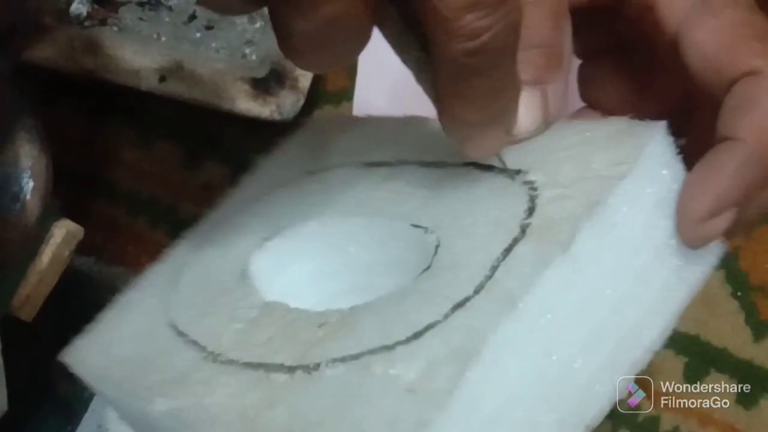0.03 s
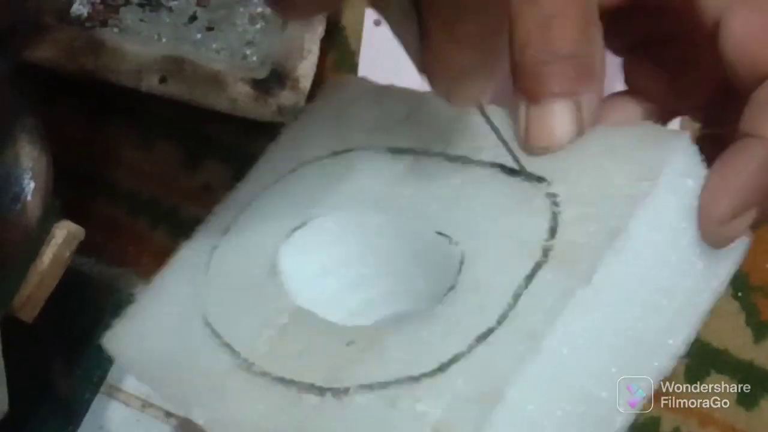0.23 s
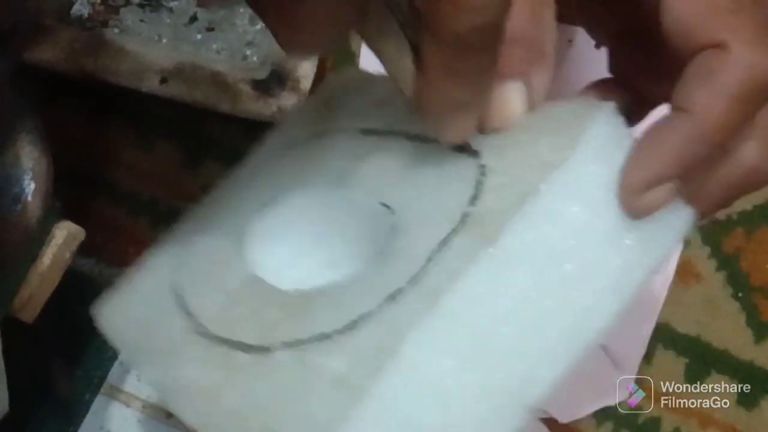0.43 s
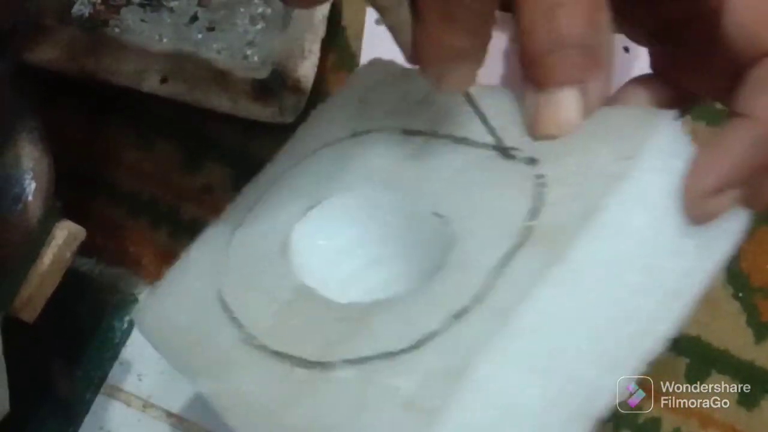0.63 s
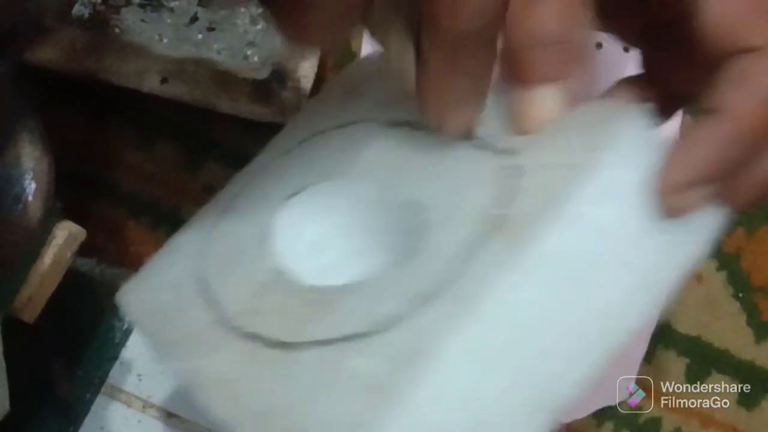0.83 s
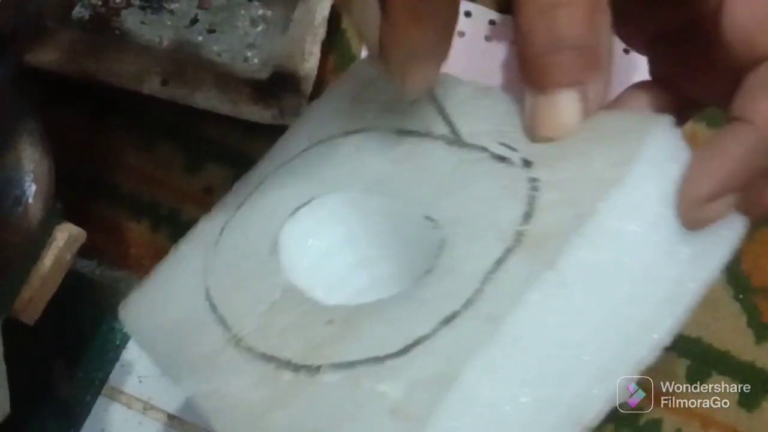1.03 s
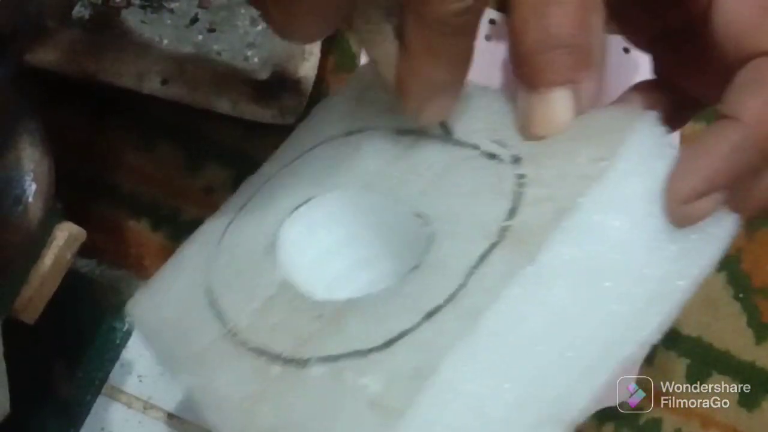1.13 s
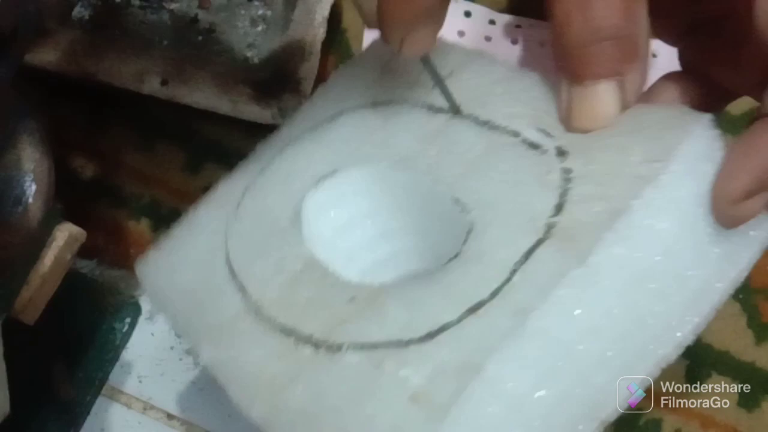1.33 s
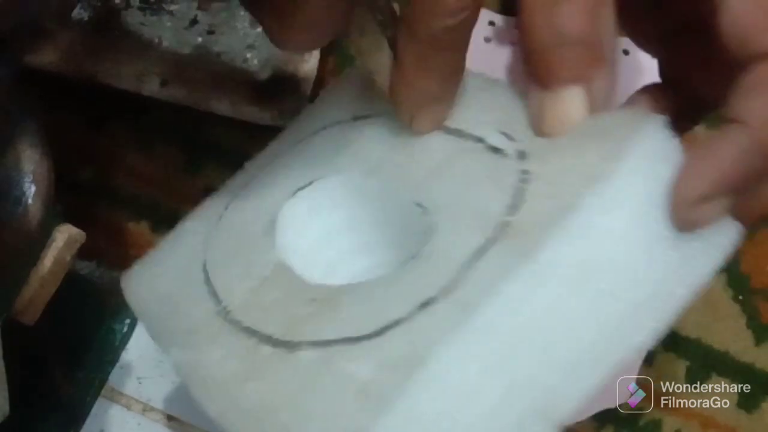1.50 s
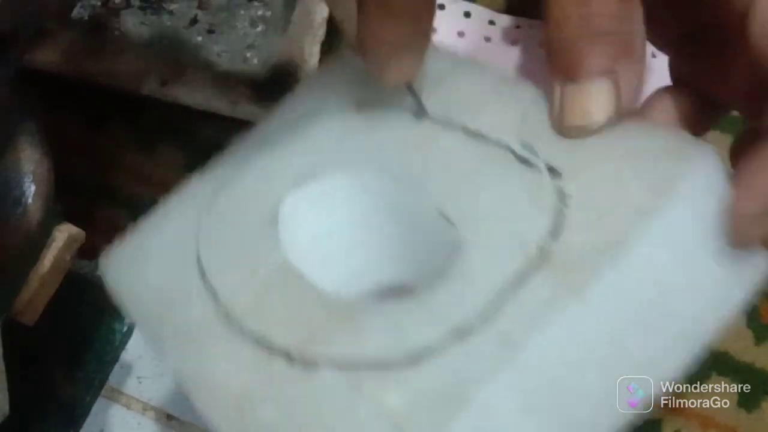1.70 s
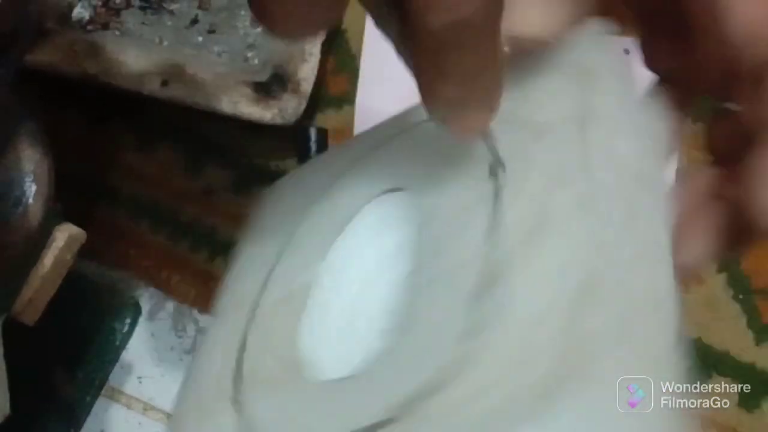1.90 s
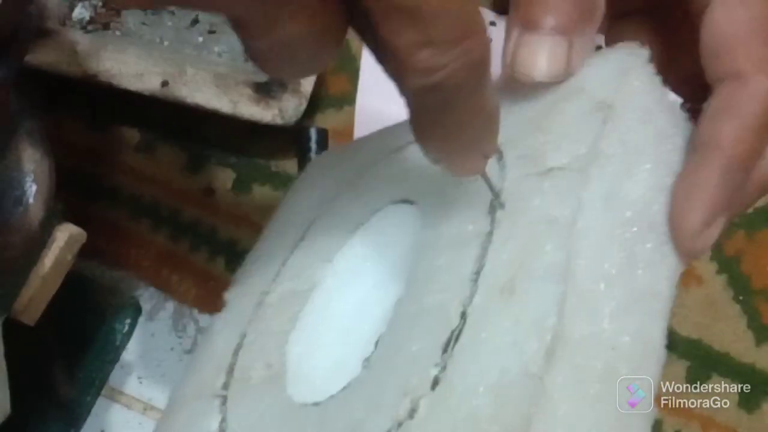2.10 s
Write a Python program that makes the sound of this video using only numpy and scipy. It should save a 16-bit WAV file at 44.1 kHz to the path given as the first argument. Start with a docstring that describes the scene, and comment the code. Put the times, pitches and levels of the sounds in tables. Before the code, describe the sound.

Close up in a small room, stiff foam rasps and crunches as a thin blade saws to and fro, sometimes snagging with a sharp click. The block bumps softly in the hands, and the last two strokes are much lighter.

```python
"""In a small room, close by, a thin blade saws to and fro through a hand-held block of stiff foam.
Each stroke tears a dense run of tiny cells that crunch and set blade and block ringing.
Now and then the blade snags and snaps free, a cell wall cracks, or the block bumps in the hands.
Nine firm strokes, then two light ones, are heard over a faint hiss and a low rumble."""
import sys
import numpy as np
from scipy import signal
from scipy.fft import rfft, irfft
from scipy.io import wavfile

SR = 44100
rng = np.random.default_rng(int(sys.argv[2]) if len(sys.argv) > 2 else 0)


def unload_audio(sound):
    """Save the sound as a 16-bit wav file, at the path given as the first command line argument."""
    columns = np.transpose(np.atleast_2d(sound))
    # keep every value between -1 and 1, then stretch to whole-number steps
    steps = np.round(np.clip(columns, -1, 1) * 32767)
    wavfile.write(sys.argv[1], SR, steps.astype(np.int16))


N = 94815
TIME = np.arange(N) / SR


def from_db(db):
    """Turn decibels into a number to multiply a sound by."""
    return 10 ** (np.asarray(db) / 20)


def unit_level(x):
    """Scale a signal so that its average power is 1."""
    return x / np.sqrt(np.mean(x ** 2) + 1e-20)


def through(x, response):
    """Filter a sound by a response (the answer to one click), scaled to an energy of 1."""
    return signal.fftconvolve(x, response / np.sqrt(np.sum(response ** 2)))[:N]


def colour(points, size=4096):
    """A response whose tone follows a curve of (Hz, dB) points."""
    hz, db = np.transpose(points)
    grid_hz = np.maximum(np.arange(size // 2 + 1) * SR / size, 1)
    gains = from_db(np.interp(np.log(grid_hz), np.log(hz), db))
    cepstrum = irfft(np.log(gains))
    cepstrum[1:size // 2] *= 2   # fold it so that nothing sounds before the click
    cepstrum[size // 2 + 1:] = 0
    return irfft(np.exp(rfft(cepstrum)))


def body(modes, band_hz, size=4096):
    """The response of a tapped object: a few fading tones, kept within a band. Wider ones die sooner."""
    t = TIME[:size]
    tones = 0
    for k, (hz, width, db) in enumerate(modes):
        fade = from_db(db) * np.sqrt(width) * np.exp(-np.pi * width * t)
        tones = tones + (-1) ** k * fade * np.sin(2 * np.pi * hz * t)
    return signal.sosfilt(signal.butter(2, band_hz, "band", fs=SR, output="sos"), tones)


def drift(rate_hz):
    """A smooth random wander, about 1 in size."""
    pole = np.exp(-2 * np.pi * rate_hz / SR)
    wander = signal.lfilter([1], [1, -2 * pole, pole * pole], rng.standard_normal(N + SR))
    return unit_level(wander[SR:])


# The tone of the hiss and of the rumble. Each row: frequency in Hz, relative level in dB.
HISS_TONE = [(200, -13.5), (330, -7), (450, -18.5), (720, -7.5), (930, -9), (1150, -2.5), (1275, 6),
             (1420, -2), (2000, -13), (2600, -14.5), (3300, -8.5), (4200, -16), (5000, -13.5), (5700, -6),
             (6200, -13), (6600, -31), (7400, -12.5), (8200, -26), (10000, -37), (13500, -40)]
RUMBLE_TONE = [(20, -10), (45, -42), (60, 1), (77, 0.5), (100, 0), (160, -11), (230, -27), (330, -9),
               (500, -33), (1500, -81)]
# How loud each is over time. Each row: time in seconds, level in dB.
HISS_LOUDNESS = [(0, -49), (.17, -52), (1.7, -51), (1.952, -53.5), (2.15, -54.5)]
RUMBLE_LOUDNESS = [(0, -60), (.45, -58), (.7, -63), (1.3, -60.5), (1.5, -57), (2.15, -54)]


def background(tone, loudness):
    """A hiss or rumble: steady noise whose level slowly rises and falls."""
    level_db = np.interp(TIME, *np.transpose(loudness))
    return from_db(level_db) * through(rng.standard_normal(N), colour(tone))


def room(x, gap_s=0.0085, fade_s=0.21, level_db=-11.5, dull_hz=7000):
    """The short, dull echo of a furnished room; it drops 60 dB in fade_s."""
    t = TIME[:SR // 2]
    tail = rng.standard_normal(len(t)) * (t > gap_s) * np.exp(-np.log(1000) * t / fade_s)
    dulling = signal.butter(2, dull_hz, fs=SR, output="sos")
    return from_db(level_db) * signal.sosfilt(dulling, through(x, tail))


# The block bumps in the hands. Each row: start in seconds, pitch in Hz, level in dB.
HAND_BUMPS = [(.3, 84, -61), (0.374, 324, -55.5), (.44, 76.7, -52), (.6, 141, -59.5), (.77, 340, -50.5),
              (.93, 168.3, -52), (1.07, 75.8, -51), (1.131, 337, -53), (1.185, 73, -53.5),
              (1.529, 335, -56.5), (1.743, 332, -56), (1.785, 80, -52), (1.868, 320, -55.5),
              (2.045, 82.5, -48)]


def bumps(rise_s=0.022, width_share=0.17):
    """Soft low rubs that swell and die as the block shifts in the grip."""
    out = 0
    for start, hz, db in HAND_BUMPS:
        age = np.maximum(TIME - start, 0) / rise_s
        swell = age * np.exp(1 - age)
        response = body([(hz, hz * width_share, 0)], (hz * .7, hz * 1.4))
        rub = swell * through(rng.standard_normal(N), response)
        level_match = np.sqrt(np.sum(swell ** 2) / np.sum(rub ** 2))
        out = out + from_db(db) * level_match * rub
    return out


# Cell walls crack. Each row: time in seconds, level in dB.
WALL_CRACKS = [(0.75, -42), (0.8246, -20), (0.8767, -27), (0.9075, -17.5), (1.0784, -33), (1.279, -19),
               (1.322, -23.5), (1.3355, -19), (1.4636, -22.5), (1.612, -37), (1.671, -29), (1.6844, -30.5),
               (1.688, -21), (2.0525, -33.5)]
# The tone of a crack. Each row: frequency in Hz, relative level in dB.
CRACK_TONE = [(400, -48), (1300, 7), (2200, 5.5), (3300, 4), (4100, 1.5), (5700, 17.5), (8200, 3.5),
              (10200, -3.5), (13000, -11), (16000, 0)]


def cracks(tail_share=0.27, decay_s=0.0019):
    """A stiff cell wall breaks with one bright click and a tiny splintering tail."""
    clicks, age = np.zeros(N), TIME[:SR // 50]
    for start, db in WALL_CRACKS:
        tail = tail_share * np.exp(-age / decay_s) * rng.standard_normal(len(age))
        clicks[int(start * SR):][:len(age)] += from_db(db) * ((age == 0) + tail)
    response = colour(CRACK_TONE)
    return signal.fftconvolve(clicks, response / np.abs(response).max())[:N]


# The blade snags. Each row: time in seconds, crunch level in dB, ring level in dB.
BLADE_SNAGS = [(0.214, -32, -35), (0.3764, -33.5, -50), (0.5604, -29, -25), (.572, -44, -35),
               (0.6388, -26, -26.5), (.777, -38, -43), (0.8238, -26, -24), (0.9054, -48, -26),
               (1.068, -33.5, -39.5), (1.248, -35, -51), (1.2799, -27, -44), (1.311, -26, -36),
               (1.3223, -38, -35.5), (1.6283, -23, -34.5), (1.642, -29, -46), (1.658, -28.5, -39),
               (1.69, -37, -52), (1.704, -32.5, -38), (1.829, -37.5, -51)]


def snags(snap_size=1.33, decay_s=0.003):
    """The blade pulls free with a snap and a burst of torn cells. Gives the crunch and ring forces."""
    forces, age = np.zeros((2, N)), TIME[:SR // 20]
    snap = snap_size * (age == 0)
    for start, *levels_db in BLADE_SNAGS:
        burst = np.exp(-age / decay_s) * rng.standard_normal(len(age))
        forces[:, int(start * SR):][:, :len(age)] += from_db(levels_db)[:, None] * (snap + burst)
    return forces


# The tone of the crunch. Each row: frequency in Hz, relative level in dB.
CRUNCH_TONE = [(150, -18.5), (450, -25), (1000, -30), (1600, -9.5), (2050, -6), (2600, -5), (3000, 1.5),
               (3500, 6), (4150, -2.5), (4750, -1), (5100, -1), (5500, 2), (6100, 1.5), (6600, -9.5),
               (7000, -4), (7500, -4), (8100, -15), (10000, -20), (12300, -27), (13700, -31), (14800, -26),
               (16000, -12)]
# The tones of the cut and of the block. Each row: pitch in Hz, width in Hz, relative level in dB.
CUT_TONES = [(1052, 89, -6), (1212, 81, 1), (1277.2, 80, 2.5)]
BLOCK_TONES = [(182, 47, -15), (340, 106, -13.5), (635, 95, 4.5), (818, 94, 1.5)]


def foam(crunch_force, ring_force, hollow_force):
    """Shaken by the blade, the cells crunch, the cut rings and the block gives a hollow tone."""
    crunch = through(crunch_force, colour(CRUNCH_TONE))
    ring = through(ring_force, body(CUT_TONES, band_hz=(910, 1400)))
    hollow = through(hollow_force, body(BLOCK_TONES, band_hz=(133, 1130)))
    return crunch + ring + hollow


def tearing(speed, spread_db=3, rub_share=0.57, judder_db=0.62):
    """The force on the blade: cells burst, more often at speed, over smooth rubbing."""
    cells_per_s = 900 + 4500 * speed
    sizes = from_db(spread_db * np.minimum(rng.exponential(1, N), 4)) * rng.choice([-1, 1], N)
    bursts = rng.random(N) < cells_per_s / SR
    cells = unit_level(sizes * bursts / np.sqrt(cells_per_s))   # denser, but no louder
    rubbing = rub_share * rng.standard_normal(N)
    judder = from_db(judder_db * drift(rate_hz=52))   # uneven grip
    return unit_level((cells + rubbing) * judder)


# The saw strokes. Each row: start, fastest moment and end in seconds, swell (low is flat, high is
# peaked), crunch, ring and hollow levels in dB, blade pitch in Hz, blade level in dB.
SAW_STROKES = [(0.197, 0.269, 0.31, 1, -35, -33, -51.5, 3110, -42.5),
               (0.383, 0.445, 0.48, 0.62, -32, -32, -50.5, 3580, -43.5),
               (0.551, 0.63, 0.66, 0.76, -32.5, -32.5, -47, 3365, -38),
               (0.718, 0.798, 0.85, 1.06, -29.5, -33, -44.5, 3114, -34),
               (0.857, .945, 1.027, 1.88, -28, -30, -42, 3420, -36.5),
               (1.062, 1.115, 1.194, 0.57, -37, -40, -52, 3070, -39),
               (1.249, 1.319, 1.3677, 1.28, -29.5, -35.5, -42, 3290, -39),
               (1.416, 1.493, 1.554, 1.72, -31, -32.5, -42.5, 3110, -33),
               (1.6, 1.677, 1.745, 0.61, -38.5, -46, -50.5, 3300, -46.5),
               (1.767, 1.779, 1.855, 0.48, -49, -58, -78, 3180, -64),
               (2.025, 2.07, 2.35, 0.3, -47.5, -54, -68.5, 3670, -59)]


def strokes(crumbs_db=-18.5, crumbs_s=0.026, blade_width_hz=152):
    """The blade speeds up and slows, singing at a pitch set by its free length and shaking the foam."""
    speeds = [np.sin(np.pi / 2 * np.interp(TIME, row[:3], [0, 1, 0])) for row in SAW_STROKES]
    force = tearing(sum(speeds))
    blade, foam_forces = 0, 0
    for speed, (_, _, end, swell, *foam_db, blade_hz, blade_db) in zip(speeds, SAW_STROKES):
        # loose crumbs still rasp as the blade turns
        crumbs = from_db(crumbs_db) * np.exp(-np.abs(TIME - end) / crumbs_s)
        push = force * np.hypot(speed ** swell, crumbs)
        foam_forces = foam_forces + from_db(foam_db)[:, None] * push
        blade_tone = body([(blade_hz, blade_width_hz, 0)], (blade_hz / 2, blade_hz * 2))
        blade = blade + from_db(blade_db) * through(push, blade_tone)
    return blade, foam_forces


def scene():
    """The sawing and its echo, with the hand bumps, hiss and rumble, in one channel."""
    blade, (crunch, ring, hollow) = strokes()
    snag_crunch, snag_ring = snags()
    saw = blade + cracks() + foam(crunch + snag_crunch, ring + snag_ring, hollow)
    mix = saw + room(saw) + bumps()
    mix += background(HISS_TONE, HISS_LOUDNESS) + background(RUMBLE_TONE, RUMBLE_LOUDNESS)
    return mix[None]


def record(dry, low_cut_hz=39, peak_hz=15000, peak_gain=1.778, top_hz=15500):
    """The microphone loses the deep bass, its opening rings in the high treble, and the top is cut."""
    heard = signal.sosfilt(signal.butter(2, low_cut_hz, "high", fs=SR, output="sos"), dry)
    ringing = signal.lfilter(*signal.iirpeak(peak_hz, Q=22, fs=SR), heard)
    steep_cut = signal.ellip(10, .3, 70, top_hz, fs=SR, output="sos")
    return signal.sosfilt(steep_cut, heard + peak_gain * ringing)


dry = scene()
out = record(dry)
unload_audio(out)
```